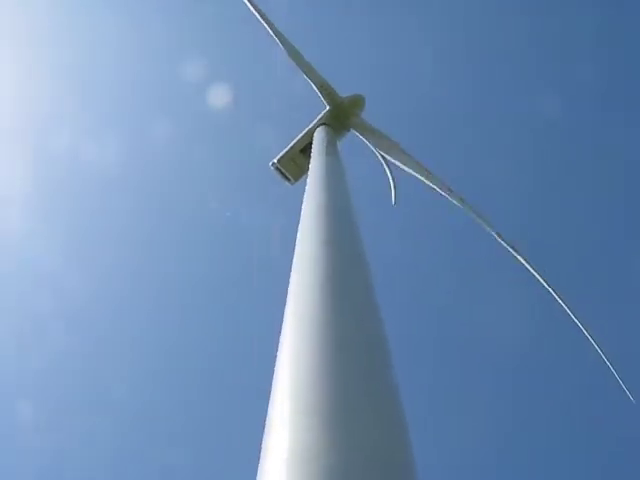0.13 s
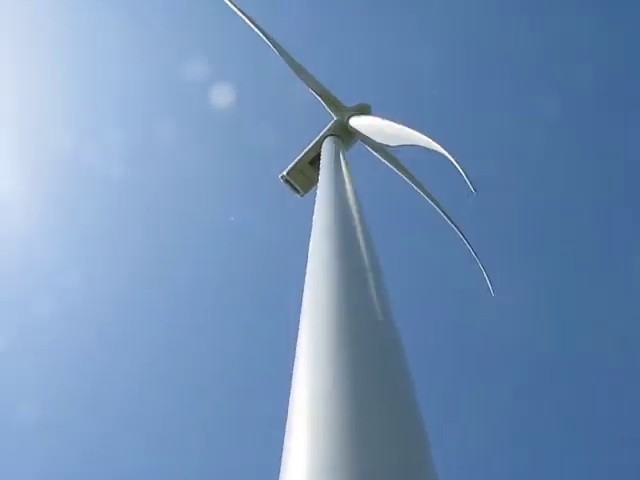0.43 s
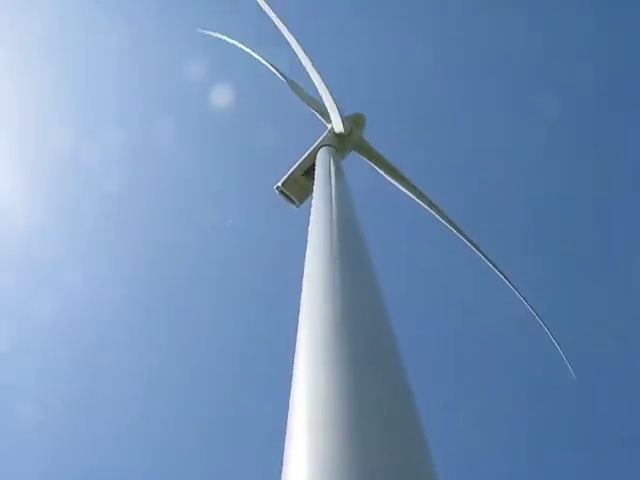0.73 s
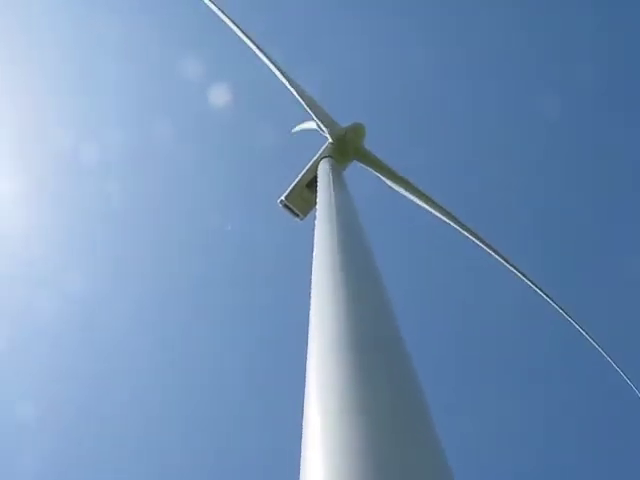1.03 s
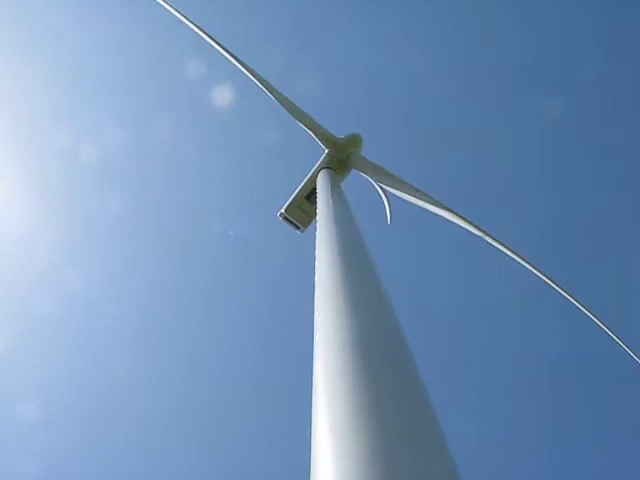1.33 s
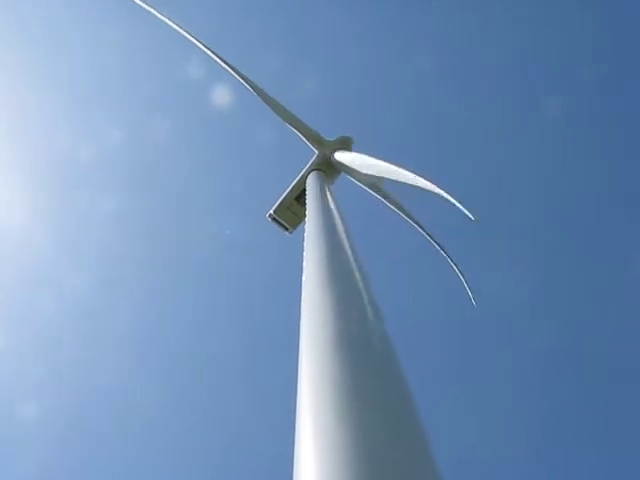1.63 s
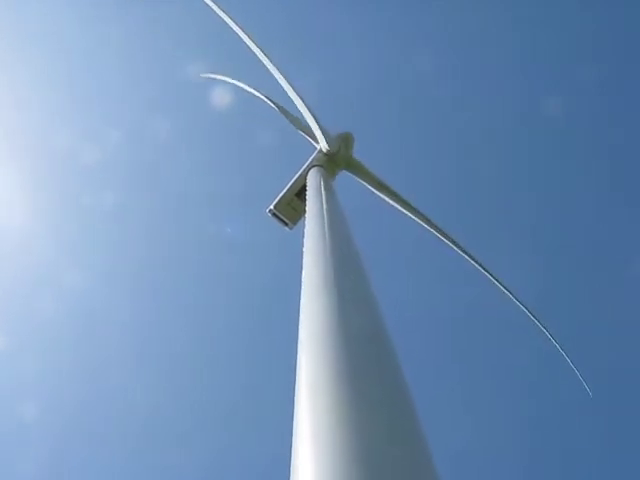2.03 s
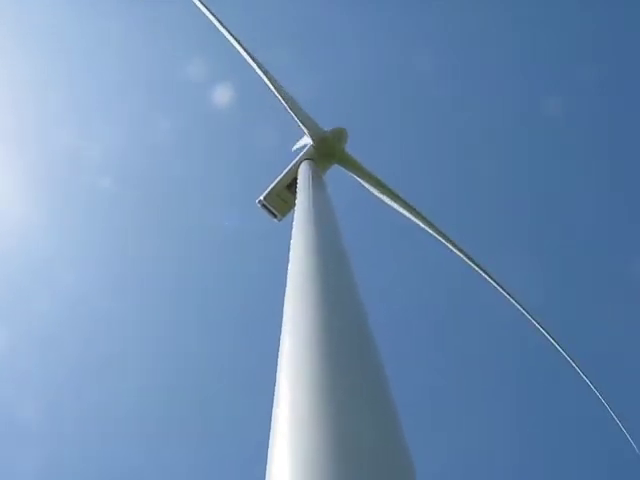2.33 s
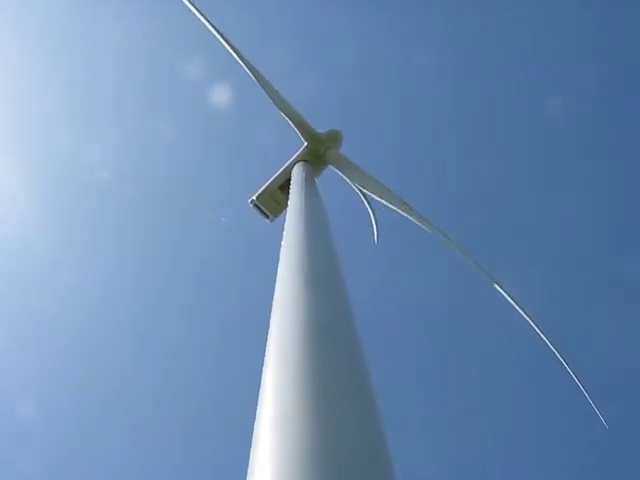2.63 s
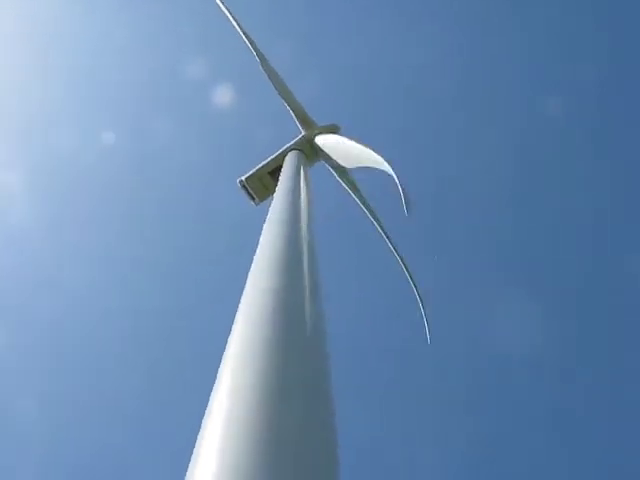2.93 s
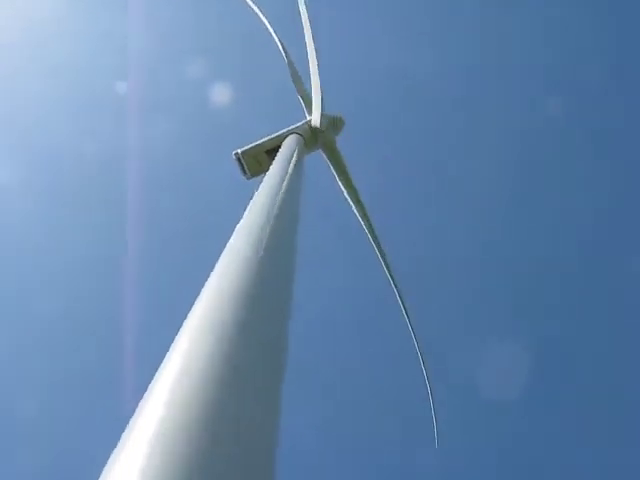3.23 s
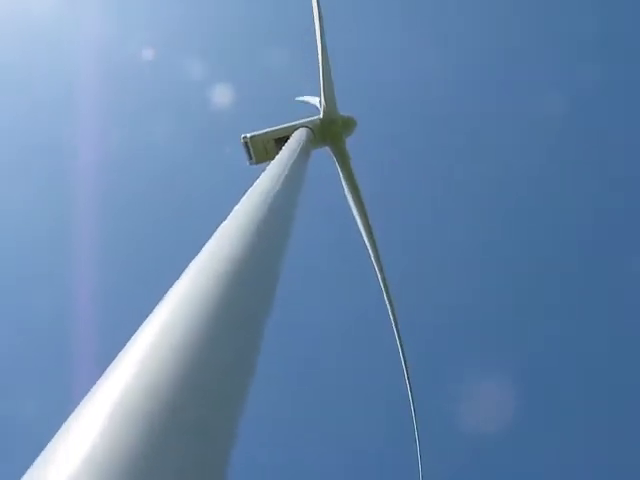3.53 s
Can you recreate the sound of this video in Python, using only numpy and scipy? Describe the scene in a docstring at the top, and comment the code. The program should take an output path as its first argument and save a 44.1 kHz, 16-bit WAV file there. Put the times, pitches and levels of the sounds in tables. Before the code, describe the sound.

Wind turbine blades swish past overhead in slow rhythm while gusty wind buffets the microphone

```python
"""Under a wind turbine in an open field, the rotor rushes steadily from the start as one blade's swish fades.
Further blades pass at 0.64, 1.87 and 3.05 s: shaped noise swells, hisses at the tip and crosses right to left.
Throughout, turbulence with a wandering level and speed buffets two microphone ports, the right one harder, with
faint crackle there. From 0.2 s short puffs slap the right port; from 1.0 s eddies snap across it as brief
falling tones. One dry tick, a decaying pulse, falls at 1.4 s."""
import sys
import numpy as np
from scipy import signal
from scipy.fft import rfft, irfft, next_fast_len
from scipy.io import wavfile
from scipy.ndimage import uniform_filter1d, map_coordinates

SR = 44100
rng = np.random.default_rng(int(sys.argv[2]) if len(sys.argv) > 2 else 0)


def master(y):
    """Save y as 16-bit WAV."""
    cut = np.clip(np.atleast_2d(y).T, -1, 1)
    pcm = np.round(cut * 32767)  # scale
    wavfile.write(sys.argv[1], SR, pcm.astype(np.int16))


N = 162729


def undb(db):
    """Logarithmic level: decibels become an amplitude gain."""
    return 10 ** (np.asarray(db) / 20)


def curve(rows):
    """Linear interpolation: straight lines in time through (seconds, value) rows."""
    return np.interp(np.arange(N) / SR, *np.array(rows).T)


def walk(rate_hz):
    """Band-limited fluctuation: random values at the given rate, joined smoothly, with spread 1."""
    steps = rng.standard_normal(N // 8)
    wander = map_coordinates(steps, [np.arange(N) / SR * rate_hz], order=3, mode="wrap")
    return wander / wander.std()


def noise(spectrum, count=1):
    """Spectral shaping: white noise filtered to the given spectrum, of rms 1 and count scenes long."""
    size = next_fast_len(count * N)
    hz, db = np.array(spectrum).T
    f = np.maximum(np.arange(size // 2 + 1) * SR / size, 1)
    low_cut = np.minimum(f / hz[0], 1) ** 2  # extra fall below the first row
    gain = undb(np.interp(np.log(f), np.log(hz), db)) * low_cut
    x = irfft(rfft(rng.standard_normal(size)) * gain, size)[:count * N]
    return x / x.std()


# Relative spectrum of the whole rotor. Each row: frequency in Hz, density in dB per Hz.
ROTOR_SPECTRUM = [(60, -4), (200, 7.5), (500, 8), (1000, -3.5), (2000, -10.5), (3200, -18), (5000, -20.5),
                  (8000, -39), (11000, -47), (15500, -59)]
ROTOR_DB, DIFFUSE_DB = -36, -11  # the diffuse part is relative to the common part


def rotor():
    """Partial coherence: a steady rush common to both ports, plus weaker independent noise at each."""
    common = noise(ROTOR_SPECTRUM)
    diffuse = np.array([noise(ROTOR_SPECTRUM), noise(ROTOR_SPECTRUM)])
    return undb(ROTOR_DB) * (common + undb(DIFFUSE_DB) * diffuse)


# Relative spectrum of the blade's edge. Each row: frequency in Hz, density in dB per Hz.
EDGE_SPECTRUM = [(300, 10), (900, -3.5), (2000, -3), (3000, 1), (4200, 2.5), (6500, -2.5), (9000, -8),
                 (12000, -16), (15500, -21.5)]
BRIGHT_AFTER_S, BRIGHT_S, DULL_HZ = 0.25, 0.67, 8000


def edge_noise(since):
    """Absorption with distance: edge noise is brightest just after the pass and dull while the blade is far."""
    x = noise(EDGE_SPECTRUM)
    dull = signal.sosfiltfilt(signal.butter(1, DULL_HZ, fs=SR, output="sos"), x)
    treble = x - dull
    return dull + treble / (1 + ((since - BRIGHT_AFTER_S) / BRIGHT_S) ** 2)


# Relative spectrum of the tip's hiss. Each row: frequency in Hz, density in dB per Hz.
TIP_SPECTRUM = [(1000, 2), (3000, -3), (5000, -1.5), (7500, -3.5), (10000, -8.5), (13000, -16),
                (15500, -16)]
# Blade passes. Each row: pass time in seconds, swish level in dB above the base, rise in seconds, fall in
# seconds, tip level in dB above the base, level change just after the pass in dB, and final lag between
# the ports in microseconds.
BLADE_PASSES = [(-.56, 4, 0.19, 0.25, -2, 0, 32), (.64, 0.1, 0.28, 0.25, 4, -0.5, 27),
                (1.865, 0.5, 0.26, 0.3, 4.5, -3, 29.3), (3.05, 4, 0.24, 0.37, 2, 2.8, 9.7)]
SWISH_BASE_DB, RISE_POWER, FALL_POWER = -41.5, 1.76, 1.56
TIP_BASE_DB, TIP_S = -44.5, 0.054
CHANGE_AFTER_S, CHANGE_S = 0.11, 0.072
FLICKER_DB, FLICKER_HZ = 1.1, 36
SCATTER_DB = -8  # relative to the swish
APPROACH_LAG_US, CROSS_S, CROSS_AFTER_S = 52, 0.34, 0.094


def blades():
    """Moving source: each edge swishes, its tip hisses when closest, and arrival lag moves it between ports."""
    t, out = np.arange(N) / SR, 0
    for at, swish_db, rise, fall, tip_db, change_db, leave_lag_us in BLADE_PASSES:
        since = t - at
        coming = since < 0
        width = np.where(coming, rise, fall)
        power = np.where(coming, RISE_POWER, FALL_POWER)
        swish = undb(SWISH_BASE_DB + swish_db) * (1 + (since / width) ** 2) ** (-power / 2)
        tip = undb(TIP_BASE_DB + tip_db) / np.cosh(np.clip(since / TIP_S, -20, 20))
        change = undb(change_db * np.exp(-((since - CHANGE_AFTER_S) / CHANGE_S) ** 2))
        flicker = undb(FLICKER_DB * walk(FLICKER_HZ))
        direct = swish * edge_noise(since) + tip * noise(TIP_SPECTRUM)

        # The right port leads before the crossing, the left port after it.
        across = np.tanh((since - CROSS_AFTER_S) / CROSS_S)
        lag_us = across * np.where(across < 0, APPROACH_LAG_US, leave_lag_us)
        shift = lag_us * SR / 1e6 / 2  # samples, half the lag at each port
        ports = np.array([map_coordinates(direct, [np.arange(N) + side * shift], order=5, mode="mirror")
                          for side in (1, -1)])
        scatter = undb(SCATTER_DB) * swish * np.array([edge_noise(since), edge_noise(since)])
        out = out + change * flicker * (ports + scatter)
    return out


PORT_LOW_CUT_HZ = 74


def buffet(mean_db, spectrum, octaves, trim_db, flutter_db, flutter_rate, eddy_db, eddy_rate, octaves_per_db):
    """Frozen turbulence: faster air carries the eddies past louder and higher; the port thins deep bass."""
    db = mean_db + flutter_db * walk(flutter_rate) + eddy_db * walk(eddy_rate)
    speed = 2 ** (octaves + octaves_per_db * (db - mean_db.mean()))
    carried = map_coordinates(noise(spectrum, count=2), [np.cumsum(speed)], order=3, mode="mirror")
    pressure = undb(db + trim_db) * carried
    return signal.sosfilt(signal.butter(1, PORT_LOW_CUT_HZ, "high", fs=SR, output="sos"), pressure)


# Mean wind pressure at each port, before trim. Each row: time in seconds, level in dB.
LEFT_GUSTS = [(0, -26.5), (.19, -23), (.3, -27.5), (.42, -23), (.7, -25), (.8, -29), (.86, -24),
              (1.1, -25.5), (1.45, -30.5), (1.6, -29.5), (1.68, -35), (1.8, -30), (1.95, -34), (2.22, -29),
              (2.35, -33), (3.03, -29), (3.1, -21), (3.22, -23.5), (3.35, -21), (3.69, -24)]
RIGHT_GUSTS = [(0, -17.5), (.15, -16), (.43, -16), (.53, -17.5), (.72, -13), (.8, -15.5), (.87, -14.5),
               (.98, -17), (1.12, -13.5), (1.25, -15.5), (1.33, -13), (1.38, -15), (1.5, -17.5),
               (1.57, -17), (1.68, -20), (1.78, -16.5), (1.9, -18.5), (1.98, -16), (2.06, -21),
               (2.13, -15.5), (2.33, -17.5), (2.41, -16.5), (2.46, -21), (2.85, -17.5), (3.03, -19.5),
               (3.12, -14), (3.35, -13), (3.41, -19.5), (3.47, -15.5), (3.6, -13), (3.69, -16)]
# Relative turbulence spectrum at each port. Each row: frequency in Hz, density in dB per Hz.
LEFT_TURBULENCE = [(20, -2), (80, 3), (140, 4.5), (220, -4.2), (350, -10), (600, -22.5), (1100, -33),
                   (2500, -46), (6000, -53.5), (15000, -86)]
RIGHT_TURBULENCE = [(20, -12), (80, -7), (140, 0.5), (220, 1), (400, -1), (600, -6), (900, -13.5),
                    (1400, -22), (2200, -30), (3500, -39.5), (6000, -62.5), (15000, -78)]
# Finer eddies at the right port as the wind turns. Each row: time in seconds, upward shift in octaves.
RIGHT_FINENESS = [(0, 0), (.25, 0.00079), (.5, 0.09), (.72, 0.096), (1.08, 0.11), (1.35, 0.14),
                  (1.55, 0.24), (1.85, 0.12), (2.05, .2), (2.3, 0.031), (2.6, -.1), (3.3, -.18),
                  (3.69, -0.075)]


def wind():
    """Incoherent pressure: the two ports are buffeted independently; the puffs hit the right one."""
    puff_db, puff_octaves = puffs()
    left = buffet(curve(LEFT_GUSTS), LEFT_TURBULENCE, 0, trim_db=1.0, flutter_db=1.5, flutter_rate=45,
                  eddy_db=1.5, eddy_rate=200, octaves_per_db=0.12)
    right = buffet(curve(RIGHT_GUSTS) + puff_db, RIGHT_TURBULENCE, curve(RIGHT_FINENESS) + puff_octaves,
                   trim_db=0.72, flutter_db=0.8653, flutter_rate=55,
                   eddy_db=1.4, eddy_rate=400, octaves_per_db=0.049)
    return np.array([left, right])


CRACKLE_PER_S, CRACKLE_HALF_S = 40, 0.00036
CRACKLE_DB, CRACKLE_SPREAD_DB = -11.5, 2.5  # relative to the gust
CRACKLE_HZ, CRACKLE_SPREAD_OCTAVES = 2000, 0.42


def crackle():
    """Random arrivals: rows for faint snaps at chance moments, their level following the right port's gusts."""
    chance = rng.standard_normal((int(CRACKLE_PER_S * N / SR), 2))
    times = rng.random(len(chance)) * N / SR
    gust_db = np.interp(times, *np.array(RIGHT_GUSTS).T)
    pitch, size = chance.T
    hz = CRACKLE_HZ * 2 ** (CRACKLE_SPREAD_OCTAVES * pitch)
    db = gust_db + CRACKLE_DB + CRACKLE_SPREAD_DB * size
    return [(at, f, level, CRACKLE_HALF_S) for at, f, level in zip(times, hz, db)]


# Puffs that slap the right port. Each row: centre in seconds, added level in dB, half-length in seconds,
# upward shift of the turbulence in octaves.
PUFF_ROWS = [(0.218, 4, .018, -0.33), (0.272, 4, .013, .2), (1.06, 4.5, .028, -0.33),
             (1.217, 3, .015, -0.23), (1.295, 2.5, 0.01395, -0.0012), (1.416, 2.5, 0.01483, -.35),
             (1.829, 5, .015, -.5), (2.191, 1.5, .02, 0.22), (2.271, 5, .014, -.55),
             (2.787, 1.15, .025, .35), (2.841, 4, .014, -0.39), (3.113, 4, .023, -0.084),
             (3.144, 2.5, .007, .45), (3.624, 4, .02, -0.34)]


def puffs():
    """Gaussian modulation: each brief puff adds a bump of dB and a shift in octaves to the wind."""
    t = np.arange(N) / SR
    return sum(np.outer([db, octaves], np.exp(-((t - at) / half) ** 2))
               for at, db, half, octaves in PUFF_ROWS)


# Eddies that snap across the right port. Each row: centre in seconds, frequency there in Hz, level in dB,
# half-length in seconds.
EDDY_SNAPS = [(1.0345, 2700, -20, .0009), (1.5537, 1940, -17.5, 0.00077), (2.1946, 2090, -26, 0.00072),
              (2.25, 3030, -26, 0.00061), (2.269, 2300, -22, 0.00063), (2.2765, 2100, -21.5, 0.00074),
              (2.2913, 1740, -16, 0.00076), (2.3089, 1930, -13.5, 0.00043), (2.7783, 1850, -12.5, 0.00057),
              (3.1232, 1250, -8, 0.001), (3.1232, 3507, -9, .0002), (3.1262, 2922, -6, .00055),
              (3.1272, 1642, -10, .0008), (3.4872, 2070, -27, 0.00074), (3.6227, 1806, -20, 0.00086)]
SNAP_GLIDE_PER_S = 370


def snaps(rows):
    """Chirped wave packet: a small fast eddy shakes the right port for a few cycles that fall in pitch."""
    t, out = np.arange(N) / SR, np.zeros((2, N))
    for at, hz, db, half in rows:
        near = slice(*np.searchsorted(t, [at - 10 * half, at + 10 * half]))
        since = t[near] - at
        # The integral of an exponentially falling frequency, from a random phase.
        cycles = hz * (1 - np.exp(-SNAP_GLIDE_PER_S * since)) / SNAP_GLIDE_PER_S + rng.random()
        out[1, near] += undb(db) * np.exp(-(since / half) ** 2) * np.sin(2 * np.pi * cycles)
    return out


TICK_S, TICK_DECAY_S = 1.4233, .0003
TICK_RIGHT_DB, TICK_LEFT_DB = -23, -6  # left is relative to right


def tick():
    """Exponential decay: one faint dry pulse, placed toward the right by level difference."""
    since = np.arange(N) / SR - TICK_S
    gains = undb([[TICK_RIGHT_DB + TICK_LEFT_DB], [TICK_RIGHT_DB]])
    return gains * (since >= 0) * np.exp(-np.abs(since) / TICK_DECAY_S)


def scene():
    """Superposition: turbine overhead, wind on the microphone, snaps and a tick add linearly."""
    return rotor() + blades() + wind() + snaps(crackle()) + snaps(EDDY_SNAPS) + tick()


LIMIT_DB, LIMIT_RATIO, LIMIT_WINDOW_S, RELEASE_DB_PER_S = -11.5, 2.34, 0.016, 3


def limit(x):
    """Dynamic compression: the louder port's power ducks both channels, which then recover slowly."""
    power = uniform_filter1d(x ** 2, int(LIMIT_WINDOW_S * SR)).max(axis=0)
    excess_db = 10 * np.log10(np.maximum(power / undb(LIMIT_DB) ** 2, 1))
    over_db = (1 - 1 / LIMIT_RATIO) * excess_db
    recovery_db = RELEASE_DB_PER_S * np.arange(N) / SR
    # A running maximum holds each duck and lets it go at the release rate.
    return x * undb(recovery_db - np.maximum.accumulate(over_db + recovery_db))


def record(dry):
    """Recorder response: it drops the lowest rumble, ducks loud wind, rounds tall peaks and cuts the top."""
    low_hz, top_hz = 32, 15650
    ceiling = 1.2  # amplitude that the rounded peaks approach
    x = limit(signal.sosfilt(signal.butter(2, low_hz, "high", fs=SR, output="sos"), dry))
    rounded = ceiling * np.tanh(x / ceiling)
    return signal.sosfilt(signal.ellip(10, .2, 80, top_hz, fs=SR, output="sos"), rounded)


dry = scene()
out = record(dry)
master(out)
```